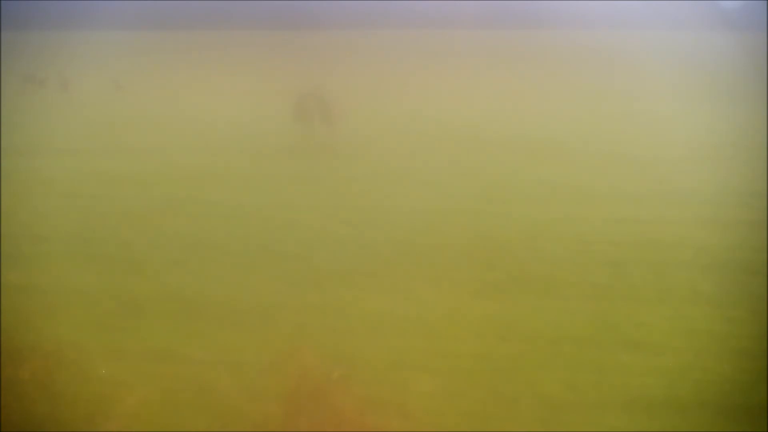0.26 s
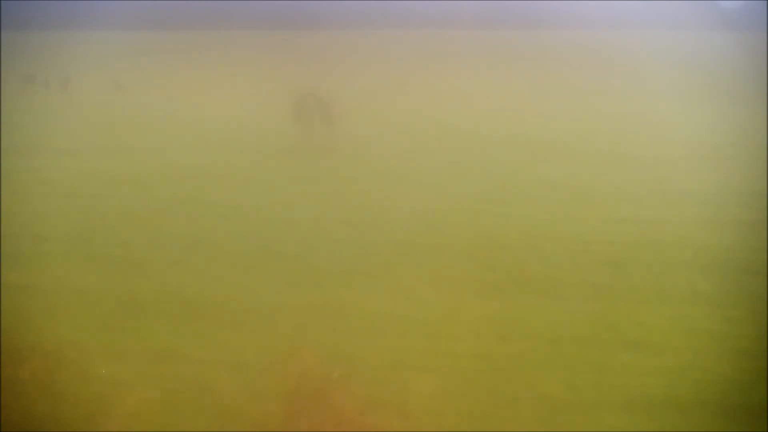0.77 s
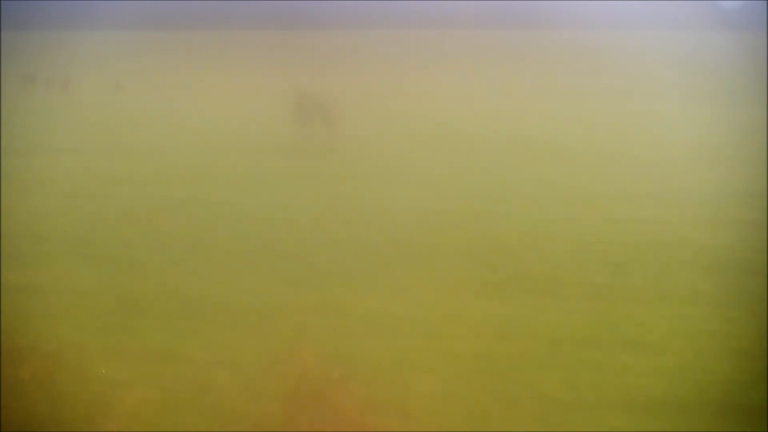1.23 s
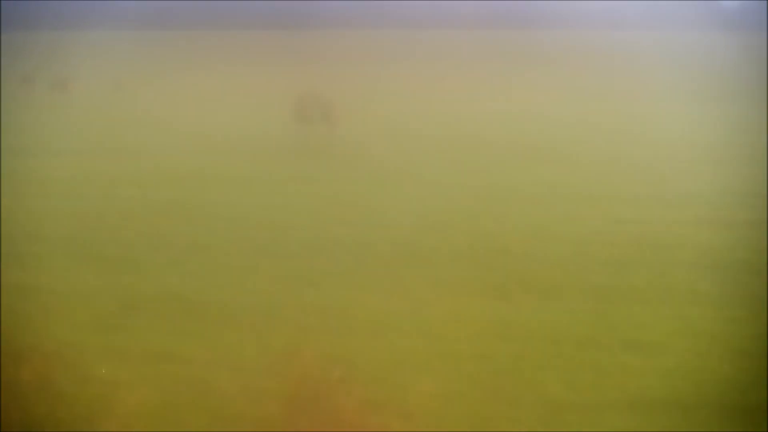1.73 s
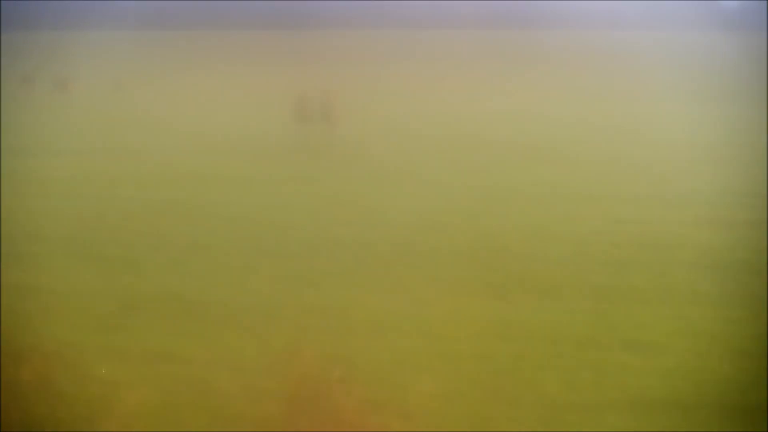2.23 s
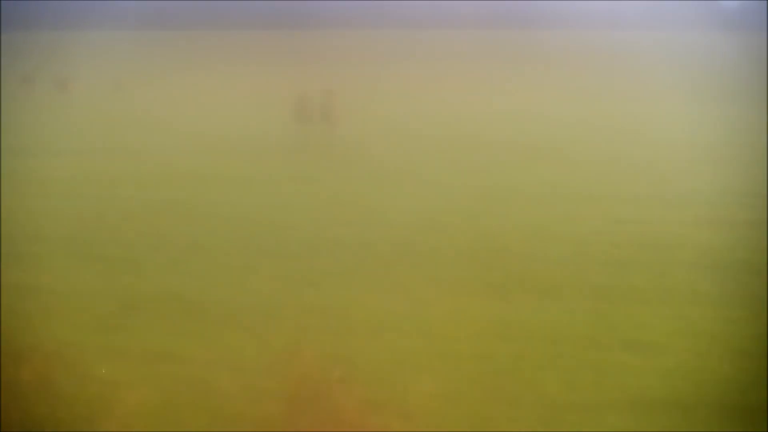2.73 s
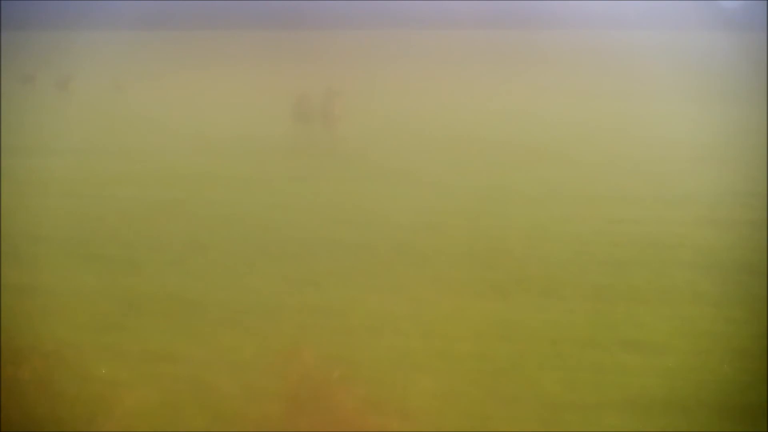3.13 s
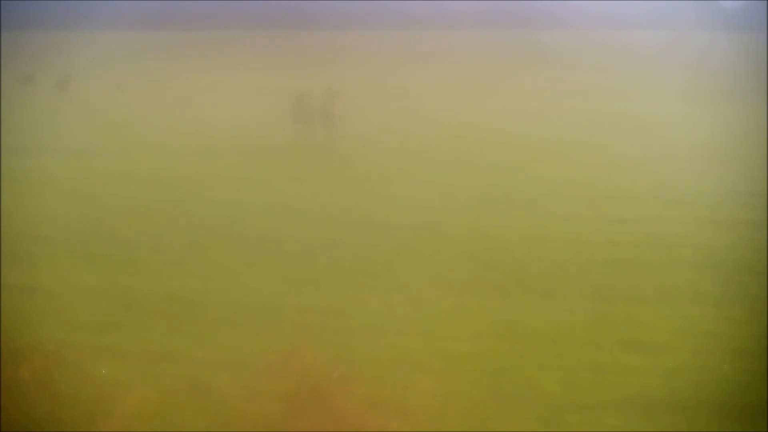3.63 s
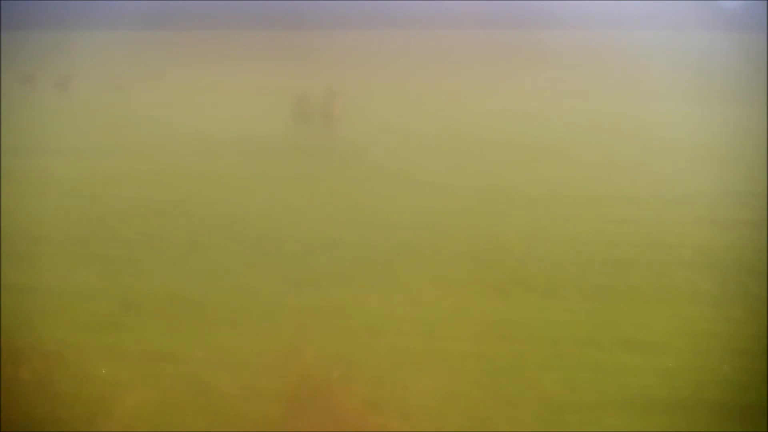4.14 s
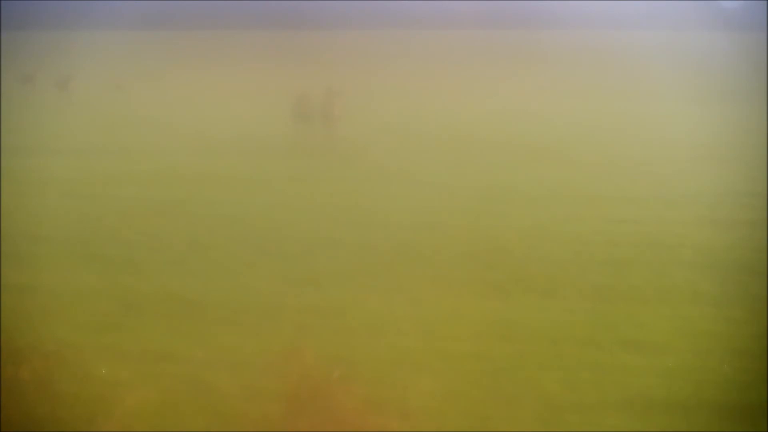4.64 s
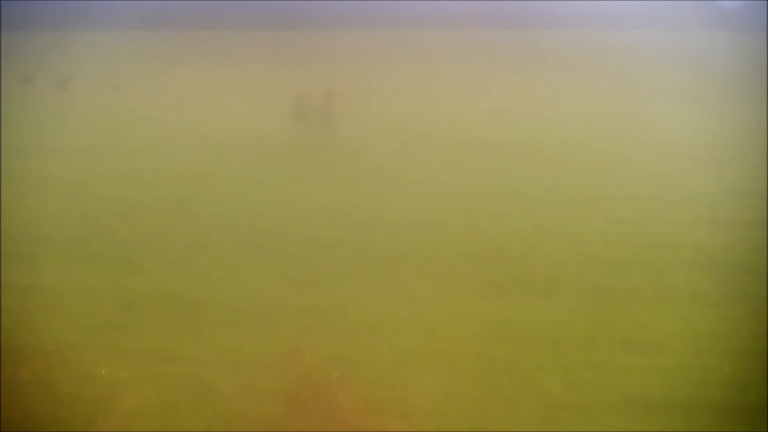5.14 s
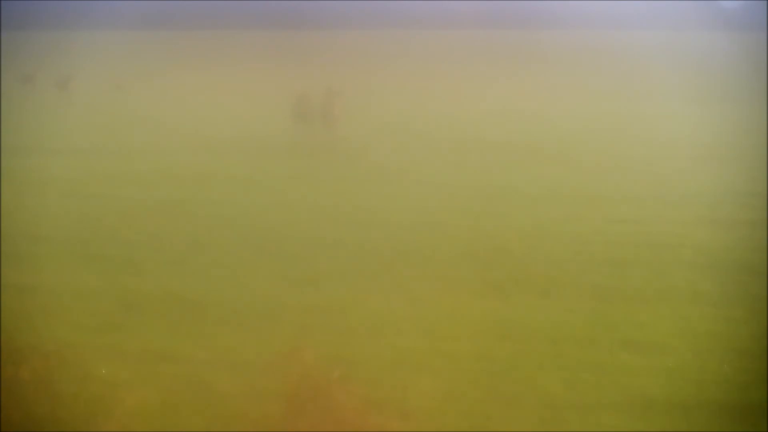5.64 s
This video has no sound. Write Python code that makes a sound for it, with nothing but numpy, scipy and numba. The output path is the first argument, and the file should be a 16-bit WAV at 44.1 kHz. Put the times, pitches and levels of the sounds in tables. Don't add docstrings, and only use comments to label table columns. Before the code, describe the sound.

Far-off red deer stag bellows twice, low and rattling, over faint field hiss, with harsh bird ticks and a third roar just beginning.

```python
import sys
import numpy as np
from scipy import signal
from scipy.fft import rfft, irfft, next_fast_len
from scipy.io import wavfile
from scipy.ndimage import uniform_filter1d, map_coordinates
from numba import njit

SR = 44100
rng = np.random.default_rng(int(sys.argv[2]) if len(sys.argv) > 2 else 0)


def persist_wave(psi):
    counts = np.round(np.clip(psi, -1, 1) * 32767).astype(np.int16)
    wavfile.write(sys.argv[1], SR, np.atleast_2d(counts).T)


def level_to_linear(level):
    exponent = np.asarray(level, float) / 20
    return 10 ** exponent


N = 259749
T = np.arange(N) / SR

# frequency in Hz, level in dB per Hz.
AIR_SPECTRUM = [(15, -56), (54, -6.5), (97, -11.5), (200, -3.5), (330, -3.5), (700, -3.5), (1300, -3.5),
                (2100, -6.5), (3200, -14.5), (4600, -25), (6300, -36), (7400, -45), (15650, -49),
                (15800, -120)]
# time in seconds, level in dB.
AIR_LEVEL = [(0, -48.6), (1, -49), (2, -49.8), (4, -49.2), (5.89, -48.8)]
# start in seconds, length in seconds, first pitch in Hz, last pitch in Hz, level in dB.
FAR_MOANS = [
    (0, 0.15, 216.4, 182, -63),
    (0.923, 0.2, 310, 331, -66.5),
    (1.296, 0.203, 292.6, 332, -63.5),
]
# centre in seconds, length in seconds, depth in dB.
TREBLE_GAPS = [(.455, .012, 12), (.605, .014, 12), (1.825, .012, 12), (2.31, .014, 20), (2.46, .012, 18),
               (3.617, .012, 12), (3.7, .012, 12), (3.805, .012, 12), (3.955, .01, 9), (4.922, .066, 35),
               (5.02, .012, 10), (5.063, .012, 16)]

# time in seconds, rise of the resonances (1 = larynx fully sunk).
LARYNX_RISE = [
    [(2.32, 1.69), (2.42, 1.45), (2.55, 1.25), (2.63, 1.14), (2.7, 1.085), (2.95, 1.03), (3.3, .995),
     (3.72, 1.005), (3.84, 1.04)],
    [(4.27, 1.27), (4.37, 1.19), (4.45, 1.135), (4.55, 1.1), (4.63, 1.085), (4.7, 1.05), (4.9, 1),
     (5.1, 1.005), (5.19, 1.04)],
    [(5.7, 3.6)],
]
# end in seconds, scale, power of the rise, highest rise.
LOWER_SCALING = [
    (4.05, 1, 1.06, 1.98),
    (5.45, 1.075, 1.45, 1.3),
    (6, 1, 1, 1.97),
]
# frequency in Hz, width in Hz, level in dB.
CHEST_MODES = [(194.7, 20.6, 6), (348.3, 27, 1.5)]
# frequency in Hz, gain in dB.
CHEST_CUT = [(90, -6), (150, 0.5)]
# start in seconds, lower chest in dB, upper chest in dB.
REGISTERS = [
    (0, -0.5, 4.5),
    (2.449, 5, -3.5),
    (2.881, -2, 2.5),
    (3.2, 2.5, -0.5),
    (4.049, -3.5, -3),
    (5.061, 0, -10),
    (5.448, -6, 1.5),
]
# frequency in Hz, width in Hz, level in dB.
THROAT_MODES = [(503, 28.4, 2.5), (815.7, 11.4, 11), (1035, 40, -2.5)]
# frequency in Hz, width in Hz, level in dB.
FIRST_MOUTH_MODES = [(1180, 28.5, 1.5), (1442, 8.8, 3.5), (1649, 20, 6.5), (1804, 52.5, 9), (2066, 53, 3.5),
                     (2417, 25, 13.5), (2705, 56, 5.5), (2840, 80, 12.5), (3095, 186, 4), (3230, 53, -44),
                     (4400, 360, -1.5)]
# frequency in Hz, width in Hz, level in dB.
LATER_MOUTH_MODES = [(1239, 12, 6), (1474, 11.8, 7), (1779.7, 52, 3), (2001.3, 180, 0.5), (2229.5, 28, 8),
                     (2520, 45, 13), (2647, 72, -21), (2800, 230, -28), (3350, 240, 6), (3504, 82, 8)]
# frequency in Hz, width in Hz, level in dB.
EDGE_MODES = [(3050, 500, 6)]
# frequency in Hz, width in Hz, level in dB.
LIP_MODES = [(3330, 220, 8), (4330, 200, 15)]
REGION_BORDERS = [480, 1330, 2640, 3150]
# frequency in Hz, gain in dB.
PATH = [(70, -9), (150, -13.5), (350, -1.5), (600, -10), (900, 6.5), (1500, 8.5), (2200, 9.5), (2700, -9.5),
        (3500, -30), (4500, -43.5), (7000, -74), (9000, -96)]

# time in seconds, peak in dB.
CREAKS = [(2.164, -40), (2.174, -41), (4.276, -41), (4.284, -39), (4.294, -30), (4.316, -39), (4.326, -30),
          (5.102, -40), (5.12, -41), (5.137, -29), (5.162, -31), (5.768, -34), (5.785, -33), (5.794, -31),
          (5.805, -22), (5.817, -37), (5.831, -28), (5.845, -28), (5.855, -20), (5.871, -20), (5.8855, -26)]
# dB above a soft slap, loss in dB per dB of strength, gain in dB when dying.
CREAK_PARTS = [
    (-11, .7, 12),
    (-10, .4, 9),
    (0, 0, 0),
    (-23, .2, 3),
    (-23, .2, 3),
]
# time in seconds, pitch in Hz, effort in dB, mouth opening in dB.
FIRST_PUSH = [(2.182, 61.91, -44.5, 10), (2.24, 78.6, -41.5, 7.5), (2.31, 94.8, -36, 6),
              (2.4, 105.8, -33, 4), (2.462, 107.6, -35.5, 5), (2.53, 106.9, -29, 1), (2.62, 101.9, -32, 6),
              (2.808, 97.8, -31, 9), (2.864, 103, -30, 2.5)]
# time in seconds, pitch in Hz, effort in dB, mouth opening in dB.
SECOND_PUSH = [(2.9, 113.8, -31, 5.5), (3.1, 104, -31, -2.5), (3.154, 100.4, -30.5, -2.5),
               (3.21, 91.86, -32.5, -0.5), (3.38, 87.53, -37, 1), (3.544, 80.66, -36.5, -5),
               (3.704, 77.22, -42, 4.5), (3.777, 69, -38.5, -3.5), (3.839, 64, -55, -11)]
# time in seconds, pitch in Hz, effort in dB, mouth opening in dB.
SECOND_ROAR = [(4.343, 77.96, -38.5, 7), (4.458, 98.02, -31.5, 6.5), (4.53, 102.8, -30.5, 8),
               (4.63, 100.1, -31, 10), (4.688, 92.06, -31.5, 6), (4.752, 80.86, -35, 5.5),
               (5.005, 72.33, -35.5, 2), (5.056, 68.94, -36.5, 1), (5.097, 63.1, -38, -1)]
# centre in seconds, half length in seconds, added roughness from 0 to 1.
ROUGH_SPELLS = [
    (2.3, .12, .04),
    (2.72, .11, .22),
    (3.2, .1, .06),
    (3.84, .3, .15),
    (4.36, .14, .11),
    (4.72, .07, .1),
    (5.1, .1, .2),
]
# shut from seconds, fully open at seconds.
EDGE_OPENINGS = [
    (2.0, 2.46),
    (4.05, 4.43),
]

# time in seconds, peak in dB, fading in dB per second.
SCOLD_NOTES = [(2.41, -62, 50.5), (2.566, -63, 82), (2.756, -62.5, 92), (3.01, -61.5, 61), (3.776, -62, 73),
               (3.975, -65.5, 53), (4.166, -65.5, 84.5), (4.458, -62.5, 64), (5.0, -60.5, 83),
               (5.19, -64, 60), (5.4, -64, 73), (5.594, -63, 72)]
# frequency in Hz, width in Hz, level in dB.
BEAK_MODES = [(4780, 550, 7), (5380, 150, 9), (5730, 65, 10), (6350, 99, 0), (6660, 590, -11.5)]


def unit(x):
    return x / np.sqrt(np.mean(x ** 2) + 1e-20)


def along(points, hz):
    f, v = np.transpose(points)
    return np.interp(np.log(hz + 1), np.log(f + 1), v)


def curves(rows):
    s, *cols = np.transpose(rows)
    return [np.interp(T, s, c) for c in cols]


def wobble(rate):
    return map_coordinates(rng.standard_normal(int(N * rate / SR) + 4), [T * rate])


def coloured(x, points):
    m = 2 * next_fast_len(N // 2 + 4096)
    gain_db = np.maximum(along(points, np.fft.rfftfreq(m, 1 / SR)), -90)
    cepstrum = irfft(np.log(level_to_linear(gain_db)), m)
    cepstrum[1:m // 2] *= 2
    cepstrum[m // 2 + 1:] = 0
    return irfft(rfft(x, m) * np.exp(rfft(cepstrum)), m)[..., :N]


def spikes(seconds, sizes):
    at = np.asarray(seconds)[:, None] * SR
    k = np.floor(at) + np.arange(-7, 9)
    shape = np.sinc(k - at) * np.cos(np.pi * (k - at) / 18) ** 2
    heights = shape * np.asarray(sizes)[:, None]
    return np.bincount(np.clip(k, 0, N - 1).astype(int).ravel(), heights.ravel(), N)


@njit
def ring(x, turn, keep):
    y, state = np.zeros(len(x)), 0j
    for i in range(len(x)):
        state = state * keep[i] * np.exp(1j * turn[i]) + x[i]
        y[i] = state.imag
    return y


def tract(x, modes, rise):
    damping = np.minimum(1 + (rise / 1.28) ** 8, 19)
    out = np.zeros(N)
    for k, (hz, width, db) in enumerate(modes):
        rung = ring(x, 2 * np.pi * hz * rise / SR, np.exp(-np.pi * width * damping / SR))
        out += (-1) ** k * level_to_linear(db) * width / 50 * rung
    return out


def air():
    z = signal.stft(rng.standard_normal(N + 1024), nperseg=512)[2]
    patches = uniform_filter1d(uniform_filter1d(rng.standard_normal(z.shape), 5, 0), 12, 1)
    noise = signal.istft(z * level_to_linear(1.1 * unit(patches)), nperseg=512)[1][:N]
    level_db = curves(AIR_LEVEL)[0] + 0.058 * wobble(8.7)
    return level_to_linear(level_db) * unit(coloured(noise, AIR_SPECTRUM))


def herd():
    out = np.zeros(N)
    for s, length, hz, end_hz, db in FAR_MOANS:
        u = np.clip((T - s) / length, 0, 1)
        pitch_hz = (hz + (end_hz - hz) * u) * (1 + 0.0223 * wobble(28.3))
        out += level_to_linear(db + 11.5) * np.sin(np.pi * u) ** 0.4 * np.sin(2 * np.pi * np.cumsum(pitch_hz) / SR)
    return out


def whine():
    tone_hz, flip_hz, first_flip_s = 7797, 59.5, .0070
    sign = np.clip(30 * np.sin(np.pi * flip_hz * (T - first_flip_s)), -1, 1)
    phase = 2 * np.pi * tone_hz * T + .25 * wobble(15)
    return level_to_linear(-71.0 + .6 * wobble(12)) * sign * np.sin(phase) + level_to_linear(-102.5) * np.sin(2 * phase)


def lost_treble(full):
    high_pass = signal.butter(14, 3800, "high", fs=SR, output="sos")
    spare_whine = signal.butter(3, [7550, 8050], "bandstop", fs=SR, output="sos")
    treble = signal.sosfiltfilt(spare_whine, signal.sosfiltfilt(high_pass, full))
    lost_db = sum(db * np.clip((length / 2 - abs(T - s)) / 0.0063 + 1, 0, 1) for s, length, db in TREBLE_GAPS)
    return treble * (1 - level_to_linear(-lost_db))


def parts(drive, steady_drive):
    high, = curves(sum(LARYNX_RISE, []))
    until, scale, power, top = np.transpose(LOWER_SCALING)
    roar = np.searchsorted(until, T)
    gape = 1.1 * np.maximum(high - 1.45, 0)
    low = np.minimum(scale[roar] * high ** power[roar] + gape, top[roar])
    first, still = roar == 0, np.ones(N)

    since, *register_db = np.transpose(REGISTERS)
    register = np.searchsorted(since, T, 'right') - 1
    deep, light = level_to_linear(uniform_filter1d(np.array(register_db)[:, register], size=900))
    chest = deep * coloured(tract(steady_drive, CHEST_MODES[:1], still), CHEST_CUT)
    chest = chest - light * tract(steady_drive, CHEST_MODES[1:], still)

    upper = tract(drive, THROAT_MODES, low)
    upper = upper - tract(drive * first, FIRST_MOUTH_MODES, high) - tract(drive * ~first, LATER_MOUTH_MODES, high)
    edge = tract(drive, EDGE_MODES, still)
    strain = (T > 2.78) & (T < 3.08)
    purse = np.minimum(high ** .6, 1.085)
    lips = tract(drive, LIP_MODES[:1], purse) + tract(drive * strain, LIP_MODES[1:], purse)

    hz = np.fft.rfftfreq(N, 1 / SR)
    below = [0, *(1 / (1 + (hz / border) ** 22) for border in REGION_BORDERS), 1]
    sources = (chest, upper, upper, edge, lips)
    return [irfft(rfft(coloured(v, PATH)) * (below[k + 1] - below[k]), N) for k, v in enumerate(sources)]


def creaks():
    soft_db = -36
    s, db = np.transpose(CREAKS)
    dying = (s > 5.0) & (s < 5.4)
    starts = (s * SR).astype(int) - 60
    owner = np.clip(np.searchsorted(starts, np.arange(N)) - 1, 0, None)
    slaps, out = spikes(s, np.ones(len(s))), np.zeros(N)
    for part, (above_db, loss, deep_db) in zip(parts(slaps, slaps), CREAK_PARTS):
        peak_db = db + above_db - loss * (db - soft_db) + deep_db * dying
        gain = level_to_linear(peak_db) / np.maximum.reduceat(abs(part), starts)
        out = out + part * uniform_filter1d(gain[owner], 60)
    return out


def folds(pitch_hz, rough):
    cycle = np.cumsum(pitch_hz) / SR
    seconds = np.interp(np.arange(1, int(cycle[-1])), cycle, T)
    chance = rng.standard_normal((len(seconds), 2))
    r = np.interp(seconds, T, rough)
    slaps = spikes(seconds + .0007 * r * chance[:, 0], level_to_linear((.7 + 3.5 * r) * chance[:, 1]))
    puffs = unit(rng.standard_normal(N) * (1.9 + np.exp(-3.5 * (cycle % 1))))
    haze = coloured(puffs, [(1800, -30), (2600, -10), (3200, -2), (20000, -2)])
    return unit(slaps) + 1.3 * rough * puffs + haze


def roars():
    pitch_hz, effort_db, open_db = curves(FIRST_PUSH + SECOND_PUSH + SECOND_ROAR)
    pitch_hz = uniform_filter1d(pitch_hz, size=900)
    on = 0
    for begin, end in ((FIRST_PUSH, SECOND_PUSH), (SECOND_ROAR, SECOND_ROAR)):
        on = on + np.clip(np.minimum(T - begin[0][0], end[-1][0] - T) / 0.0025, 0, 1)
    rasp = .028
    for s, half, more in ROUGH_SPELLS:
        rasp = rasp + more * np.clip(1.3 * (1 - abs(T - s) / half), 0, 1)
    chest, *upper = parts(folds(pitch_hz, rasp), folds(pitch_hz, rasp / 8))

    rise = curves(sum(LARYNX_RISE, []))[0]
    spare_db = effort_db + 31
    chest_db = -38 + 0.45 * spare_db - 15 * (rise - 1)
    shut = sum((T > s) * np.clip((full - T) / 0.08, 0, 1) for s, full in EDGE_OPENINGS)
    top_db = 0.44 * spare_db - 11 * shut
    short = np.clip((rise - 1) / 0.21, 0, 1)
    edge_db = -47 + top_db - 13.5 * short
    lips_db = -55.5 + top_db + 2 * short
    levels_db = (effort_db - open_db / 2, effort_db + open_db / 2, edge_db, lips_db)
    out = level_to_linear(chest_db) * unit(chest)
    for part, db in zip(upper, levels_db):
        power = abs(uniform_filter1d(part ** 2, size=6000))
        out = out + level_to_linear(db) * part / np.sqrt(power + 1e-9)
    return on * out


def field(x):
    t = np.arange(SR // 2) / SR
    tail = rng.standard_normal(len(t)) * level_to_linear(-60 * t / 0.17) * (t > .008)
    echo = level_to_linear(-14) * tail / np.linalg.norm(tail)
    echo[0], echo[round(.0043 * SR)] = 1, level_to_linear(-12)
    for hz in (1300, 1550, 1800, 2100, 2400):
        pole = np.exp((-np.pi * 500 + 2j * np.pi * hz) / SR)
        poles = [1, -2 * pole.real, abs(pole) ** 2]
        x = signal.lfilter(poles[::-1], poles, x)
    return signal.fftconvolve(x, echo)[110:N + 110]


def bird():
    level = 0
    for s, db, fade in SCOLD_NOTES:
        envelope_db = db - np.maximum(503.5 * (s - T), fade * (T - s))
        catch_db = np.exp(-((T - s - 0.012) / 0.018) ** 2)
        level = level + level_to_linear(envelope_db - catch_db)
    cycle = np.cumsum(450 * (1 + .01 * wobble(60))) / SR
    seconds = np.interp(np.arange(1, int(cycle[-1])), cycle, T)
    pulses = spikes(seconds, level_to_linear(3 * rng.standard_normal(len(seconds))))
    drive = unit(pulses) + 2.2 * rng.standard_normal(N)
    voice = tract(drive, BEAK_MODES, np.ones(N))
    return level * unit(coloured(voice, [(3600, -61), (4400, -6.0), (6900, -1.5), (7600, -29.5)]))


def scene():
    return (air() + herd() + field(creaks() + roars()) + bird())[None]


def top_cut(x):
    return signal.sosfilt(signal.butter(12, 15720, fs=SR, output="sos"), x)


def record(dry):
    full = dry + whine()
    lost = lost_treble(full)
    closing = np.clip((N / SR - T) / .001 + .5, 0, 1)
    return top_cut(full * closing - lost)


dry = scene()
out = record(dry)
persist_wave(out)
```